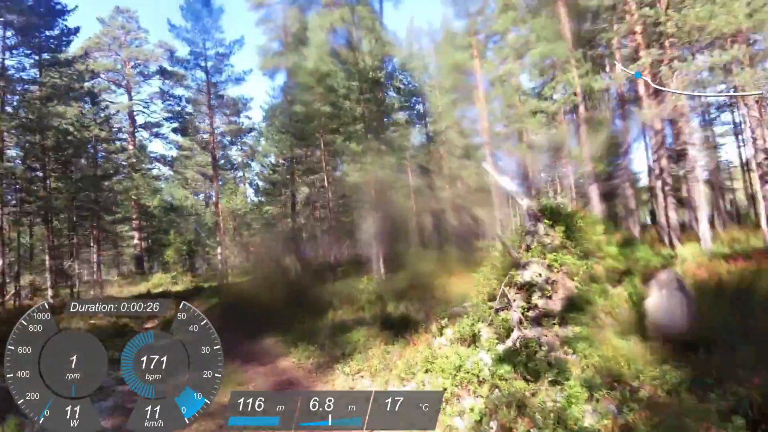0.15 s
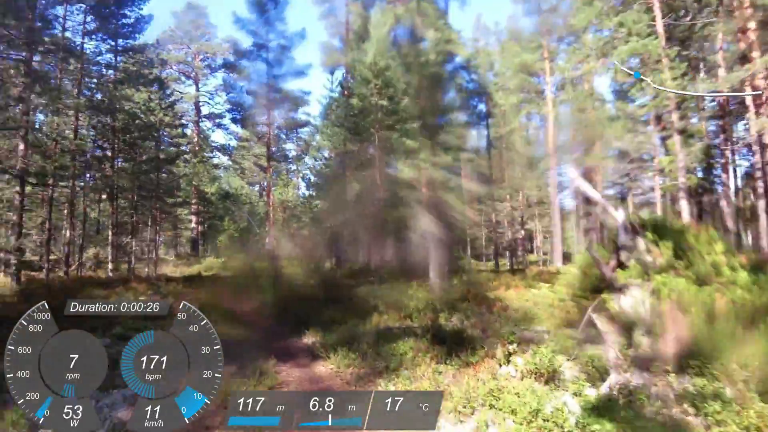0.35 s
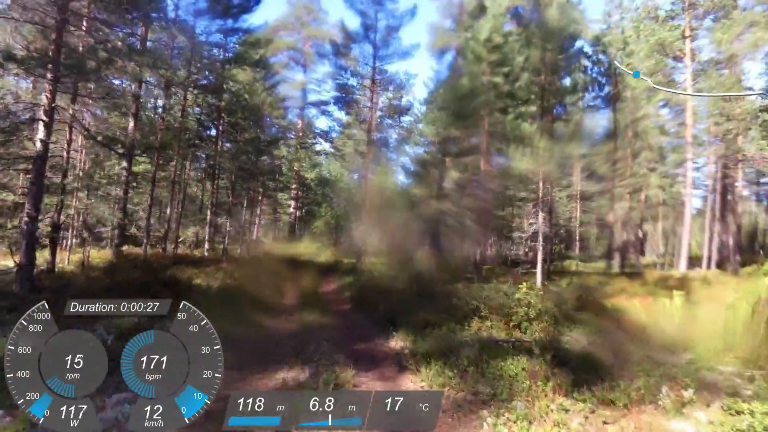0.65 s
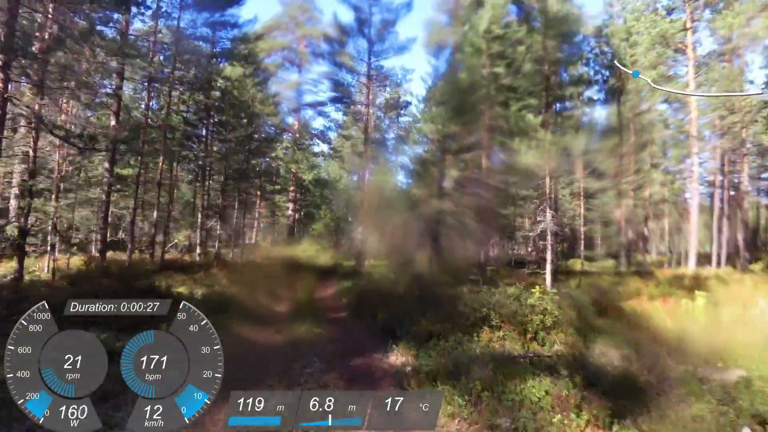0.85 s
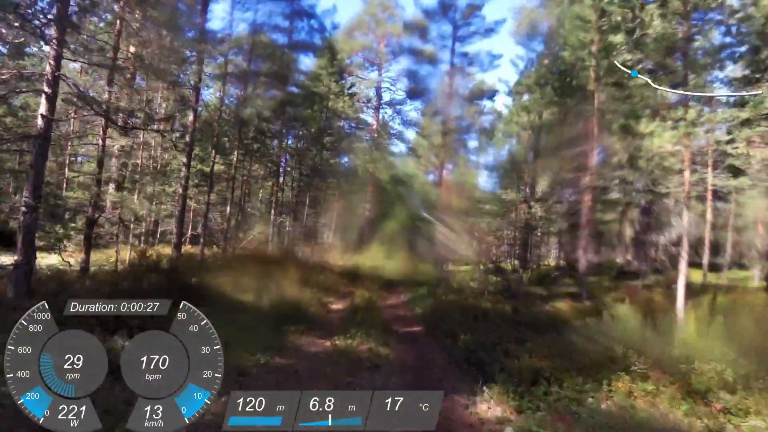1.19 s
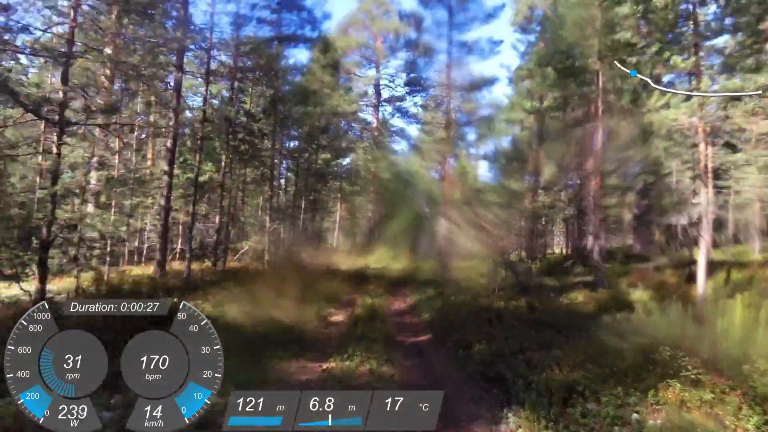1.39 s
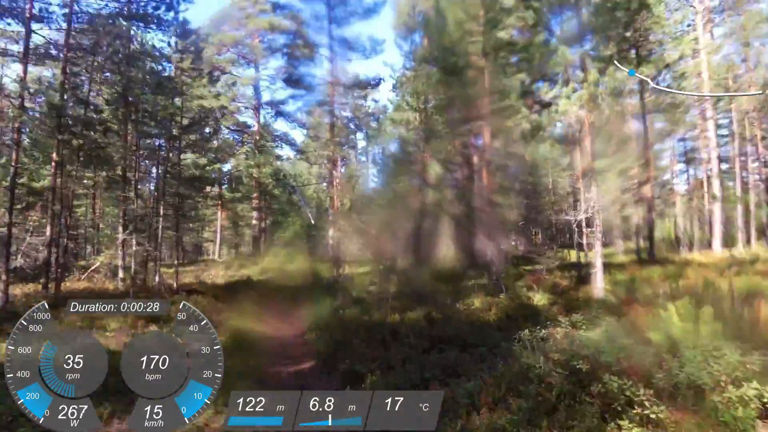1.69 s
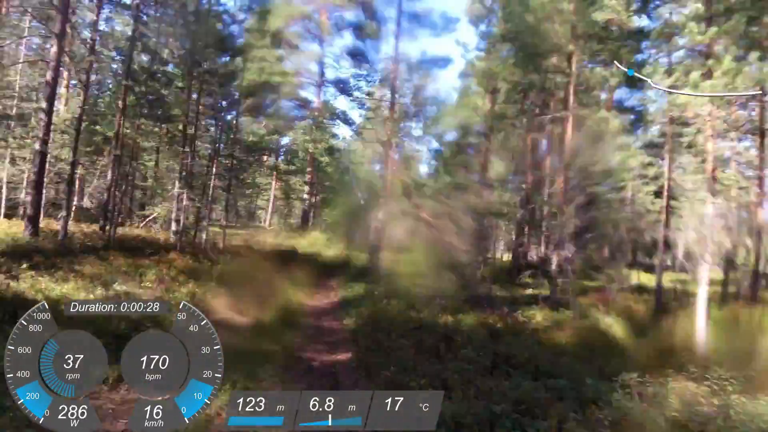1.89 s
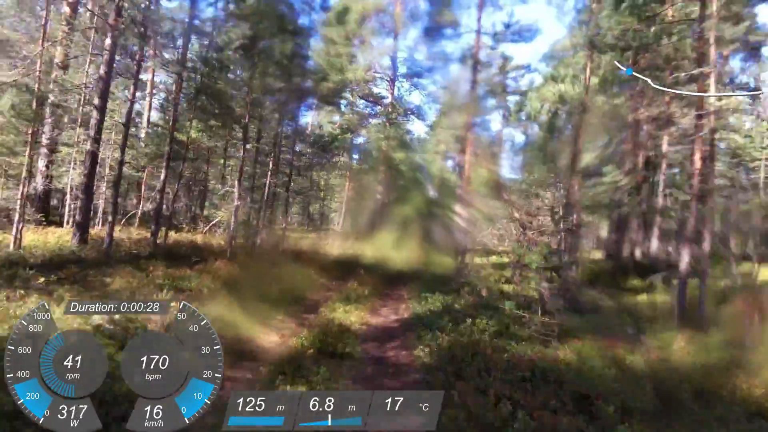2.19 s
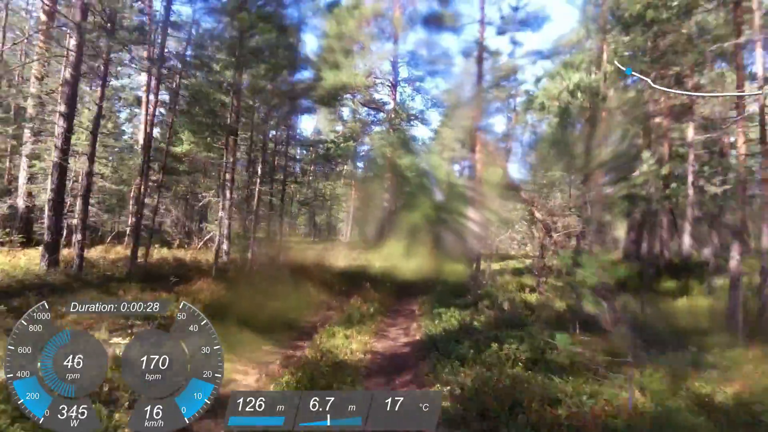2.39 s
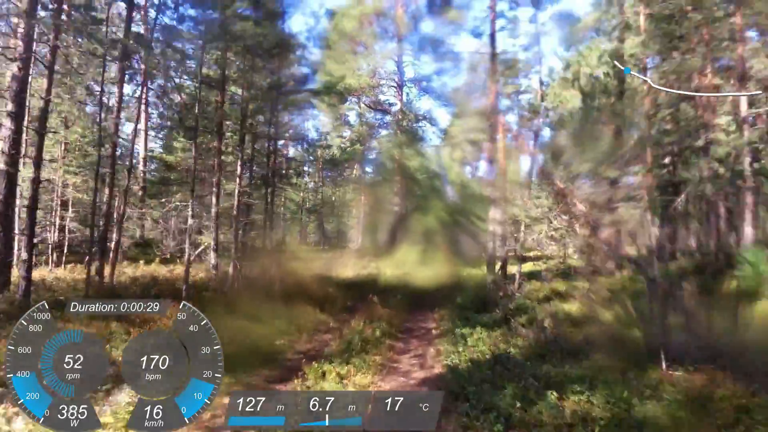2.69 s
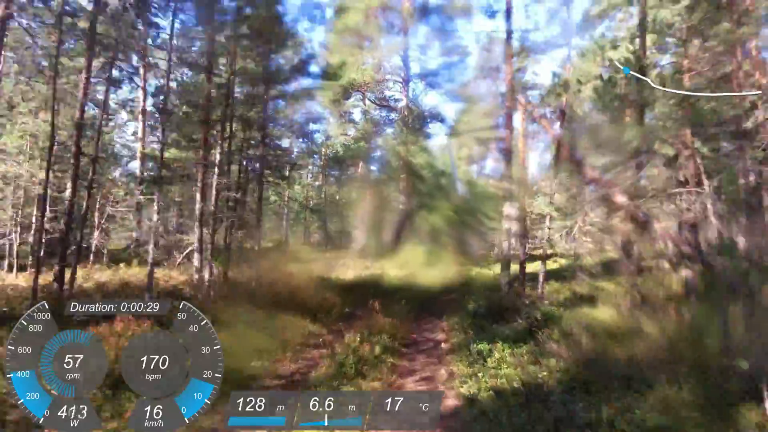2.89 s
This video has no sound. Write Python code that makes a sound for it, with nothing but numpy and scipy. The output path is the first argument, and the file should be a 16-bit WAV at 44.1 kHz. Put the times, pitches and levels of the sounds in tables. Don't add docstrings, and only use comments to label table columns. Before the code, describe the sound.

A mountain bike rattles over roots on a forest trail: an opening burst of hard knocks, scattered clacks and chain ticks, then denser blows, heard close and muffled through a camera clamped to the bike.

```python
import sys
import numpy as np
from scipy import signal
from scipy.io import wavfile
from scipy.ndimage import uniform_filter1d

SR = 44100
rng = np.random.default_rng(int(sys.argv[2]) if len(sys.argv) > 2 else 0)


def master(y):
    cut = np.clip(np.atleast_2d(y).T, -1, 1)
    pcm = np.round(cut * 32767)
    wavfile.write(sys.argv[1], SR, pcm.astype(np.int16))


def magnitude_from_level(level_db):
    exponent = np.asarray(level_db, float) / 20
    return 10 ** exponent


N = 134505

# time_s, tyre_bounce_db, frame_hum_db, chain_load_db
RIDE = [(0, -29, -31, -42.5), (.1, -46, -25, -31), (.24, -49.5, -31, -42), (0.502, -38.5, -28, -44.5),
        (.62, -30.5, -28, -45.5), (1.002, -33, -30.5, -44.5), (1.301, -26.5, -32.5, -38),
        (1.501, -36.5, -23.5, -37), (1.6, -38.5, -31.5, -43.5), (1.9, -33, -29.5, -39.5),
        (2.15, -26, -31, -38), (2.37, -34, -30, -41), (2.601, -30, -32.5, -35.5), (3.05, -34, -23, -37.5)]
# pitch_hz, width_hz, level_db
TYRE_MODES = [(102.5, 19, -5.5), (132, 25, -5.5), (175, 160, -6), (255, 50, -7), (303.5, 89, -10)]
# pitch_hz, width_hz, level_db
FRAME_MODES = [(300, 160, -3.5), (431.5, 90.5, -2.5), (490, 44.6, -6), (576, 172, -2.5), (698, 150, -11),
               (826, 144, -10)]
# pitch_hz, width_hz, level_db
HOUSING_MODES = [(1150, 310, 1.5), (1600, 180, 3), (2105, 320, 4.5), (2485, 180, 4), (3080, 383, 3),
                 (3586, 626, 4), (3769, 624, 3), (4850, 1000, -12)]
# pitch_hz, width_hz, level_db
WHEEL_MODES = [(426.2, 11, -2), (471, 11.2, -2), (572.6, 50, -3), (700, 48, -6), (863, 71, -22.5),
               (1430, 45, -29.5), (1590, 46, -29)]
# start_s, level_db, t60_s, end_s
SINGS = [
    (.2, -22, 5.9, .56),
    (1.267, -19, 0.68, 1.46),
    (2.568, -25.5, 2.1, 3.2),
]
# start_s, level_db, pitch_hz, t60_s
RIM_PARTIALS = [(2.755, -29, 3311, .3), (2.565, -34, 1620, .3), (2.57, -44, 3300, .3),
                (1.303, -30, 1600, .06), (1.339, -32, 1640, .06), (1.697, -25, 2600, .07),
                (.964, -13, 1440, .035), (2.316, -21, 1600, .06), (.582, -9, 900, .045),
                (.2, -39, 1590, .6), (.24, -43, 1430, .4), (1.236, -7, 2250, .05), (.664, -24, 1500, .06),
                (2.58, -27, 700, .5), (2.78, -27, 710, .5), (2.314, -30, 6400, .03),
                (1.551, -10, 3050, .04), (2.482, -13, 2160, .04)]
# start_s, level_db, pitch_hz
THUDS = [(0.095, -6, 175), (0.137, -0.5, 117.8), (0.3, -22, 470), (0.39, -20, 475), (0.426, -23, 444),
         (1.255, -13, 243), (0.511, -23, 470), (1.976, -14.5, 280), (2.234, -13, 424), (2.495, -14, 289),
         (2.769, -1.5, 329), (0.552, -7, 133), (0.74, -12, 126), (0.973, -10, 137), (1.243, 1.5, 255),
         (1.502, -1.5, 125.4), (1.529, -10, 300), (1.7, -12, 269), (1.97, -7.5, 247.6), (2.179, -10.5, 114),
         (2.211, -9, 193.5), (2.272, -5, 198), (2.276, -7, 322), (2.32, -7, 256), (2.489, -15.5, 180),
         (2.556, 1, 256), (2.564, -12, 106.8), (2.659, -6.5, 284), (2.952, -17, 117.4)]
# start_s, level_db, pitch_hz
TICKS = [(0.038, -26, 2220), (0.083, -30, 2650), (0.088, -21, 2980), (0.2197, -33, 3690), (0.27, -38, 3000),
         (0.393, -33, 3080), (0.722, -35, 2600), (0.809, -49, 2100), (1.176, -35, 2530), (1.228, -27, 2190),
         (1.376, -33.5, 2360), (1.566, -31, 3000), (0.924, -31, 3100), (1.458, -14, 2150),
         (1.529, -21, 3070), (1.54, -16, 3060), (1.676, -18, 3600), (1.682, -11.5, 2360),
         (1.769, -24.5, 2580), (1.81, -23.5, 1990), (1.841, -43.5, 3270), (1.912, -22, 3080),
         (2.036, -36, 1600), (2.333, -20, 3380), (2.408, -14.5, 3590), (2.425, -11, 3080),
         (2.999, -25.5, 2070), (1.62, -40.5, 2500), (1.861, -38, 3060), (1.892, -42, 3380),
         (2.097, -42, 3270), (2.178, -32, 2500), (2.694, -33, 3420), (2.897, -40, 3150), (3.035, -31, 3300)]
# start_s, clack_db, frame_db, frame_pitch_hz, frame_t60_s
KNOCKS = [(0.104, -1.5, 4.5, 378.6, 0.12), (.116, 4.5, 4, 427.7, 0.045), (.127, -3, -8.5, 340, 0.062),
          (0.155, 0.5, 6, 371.5, 0.085), (.169, -2, -1, 413, 0.058), (.581, -5.5, -6, 437, 0.021),
          (.737, -21.5, -7.5, 426, 0.061), (.748, -19.5, -24.5, 434, 0.031),
          (0.961, -13.5, 1.5, 490, 0.023), (1.235, 2, -1, 454.3, 0.064), (1.473, -1.5, -1, 489.3, 0.12),
          (1.487, -1, -4.5, 450, 0.086), (1.549, -2, -12.5, 443, 0.04), (1.691, -6, -9, 508, 0.047),
          (1.721, -16.5, -8, 530, 0.02), (1.964, -12.5, -5, 516, 0.015), (2.016, -4, -5, 490, 0.021),
          (2.204, -1, -5, 330.5, 0.027), (2.221, -2.5, -9, 440, 0.019), (2.266, -13, -8.5, 420.5, 0.049),
          (2.313, -5.5, -10, 264, 0.093)]
# start_s, clack_db, frame_db, frame_pitch_hz, frame_t60_s
LATE_KNOCKS = [(0.654, -28, -12.5, 300, 0.03), (.664, -27, -16.5, 355, 0.015),
               (0.937, -22, -18.5, 528, 0.071), (2.131, -18, -12.5, 400, 0.013),
               (2.450, -6.5, -5, 564, 0.014), (2.481, -5.5, -8.5, 325.6, 0.07),
               (2.549, 4, -2.5, 423.2, 0.066), (2.646, 2, -3, 511, 0.056), (2.722, -16, -12.5, 324.4, 0.12),
               (2.752, 0.5, -4.5, 419, 0.064), (2.854, -15.5, -1.5, 275, 0.054),
               (2.945, -5.5, -4, 546, 0.018), (2.956, -3.5, -8.5, 400.6, 0.039),
               (.142, -14.5, -12.5, 300, 0.058), (0.187, -17, -9, 481, 0.062),
               (.207, -23.5, -12, 464, 0.054)]
CLACK_HZ = [1663, 1374, 1430, 2110, 1600, 3100, 3300, 1460, 1456, 3705, 3010, 1600, 3015, 2360, 2380, 2414,
            3090, 1590, 3030, 2365, 3100, 1600, 1590, 2530, 3430, 3245, 2184, 2506, 2196, 1670, 3296, 1090,
            2495, 1630, 3040, 2140, 1486]


def peaked(x):
    return x / (abs(x).max() + 1e-12)


def evened(x):
    return x / np.sqrt(np.mean(x ** 2) + 1e-20)


def add(mix, start_s, sound):
    part = mix[max(round(start_s * SR), 0):][:len(sound)]
    part += sound[:len(part)]


def lumps(per_s):
    grid_hz = 400
    count = int(N / SR * grid_hz) + 2
    steps = uniform_filter1d(rng.standard_normal(count), size=max(int(grid_hz / per_s), 1))
    return np.interp(np.arange(N) / SR * grid_hz, np.arange(count), evened(steps))


def ring(x, modes, spread_db=0., steep=True, wander_db=0.):
    out = np.zeros(len(x))
    chance = rng.standard_normal(len(modes))
    for k, (hz, width, db) in enumerate(modes):
        radius = np.exp(-np.pi * width / SR)
        pole = [1, -radius * np.exp(2j * np.pi * hz / SR)]
        y = signal.lfilter([1 - radius], pole, x)
        if steep:
            y = signal.lfilter([1 - radius], pole, y)
        drift = magnitude_from_level(wander_db * lumps(11)) if wander_db else 1
        sign = (-1) ** k
        out += sign * magnitude_from_level(db + spread_db * chance[k]) * drift * y.real / np.sqrt(width)
    return out


def wind():
    gusts = rng.standard_normal(N) * magnitude_from_level(8.9 * lumps(3.5))
    return magnitude_from_level(-74) * evened(ring(gusts, [(50.3, 45, 0)]))


def trail_hiss(load_db):
    band = evened(ring(rng.standard_normal(N), [(4800, 5700, 0)]))
    return magnitude_from_level(-54 + 0.5 * load_db + 2.8 * lumps(8)) * band


def tyre_bounce(bounce_db):
    shaking = rng.standard_normal(N) * magnitude_from_level(3.5 * lumps(20))
    return evened(ring(shaking, TYRE_MODES)) * magnitude_from_level(bounce_db + 6.0)


def frame_hum(hum_db):
    shaking = rng.standard_normal(N) * magnitude_from_level(0.56 * lumps(50))
    return evened(ring(shaking, FRAME_MODES[1:], spread_db=3)) * 0 + hum_level(shaking, hum_db)


def hum_level(shaking, hum_db):
    return evened(ring(shaking, FRAME_MODES[1:], wander_db=3)) * magnitude_from_level(hum_db - 1.5)


def housing_chatter(load_db):
    impacts_per_s, grit_t60 = 240, 0.0064
    hits = rng.random(N) < impacts_per_s / SR
    impacts = hits * magnitude_from_level(2 * np.minimum(rng.exponential(1, N), 4))
    decay = magnitude_from_level(-60 * np.arange(800) / SR / grit_t60)
    grit = evened(signal.oaconvolve(impacts, decay)[:N] * rng.standard_normal(N))
    shaking = rng.standard_normal(N) * magnitude_from_level(2.5 * lumps(30)) + magnitude_from_level(-9.5) * grit
    return evened(ring(shaking, HOUSING_MODES, wander_db=0.5)) * magnitude_from_level(load_db - 8.0)


def rolling():
    time_s, *levels = np.transpose(RIDE)
    bounce_db, hum_db, load_db = [np.interp(np.arange(N) / SR, time_s, db) for db in levels]
    ground = tyre_bounce(bounce_db) + frame_hum(hum_db)
    return ground + wind() + trail_hiss(load_db) + housing_chatter(load_db)


def wheel_singing():
    t = np.arange(N) / SR
    level = np.zeros(N)
    for start, db, t60, end in SINGS:
        gate = np.clip(np.minimum(t - start, end - t) / 0.0062, 0, 1)
        level += magnitude_from_level(db - 60 * np.maximum(t - start, 0) / t60) * gate
    shaking = rng.standard_normal(N) * magnitude_from_level(0.73 * lumps(45))
    return level * evened(ring(shaking, WHEEL_MODES, spread_db=4.2))


def damped_partial(db, hz, t60, rise_s):
    t = np.arange(12000) / SR
    return magnitude_from_level(db - 60 * t / t60) * np.minimum(t / rise_s, 1) * np.sin(2 * np.pi * hz * t)


def rim_partial(db, hz, t60):
    return damped_partial(db, hz, t60, rise_s=0.0066)


def thud(db, hz):
    return damped_partial(db, hz, 17.3 / hz, rise_s=0.0024)


def tick(db, hz):
    t = np.arange(2500) / SR
    burst = rng.standard_normal(len(t)) * magnitude_from_level(-60 * t / 0.022) * np.minimum(t / 0.0013, 1)
    snap = magnitude_from_level(-20.5) * peaked(ring(burst, [(3100, 2100, 0)]))
    body = 1.1 * peaked(ring(burst, HOUSING_MODES[1:], spread_db=3))
    favoured = peaked(ring(burst, [(hz, 500, 0)]))
    return magnitude_from_level(db) * peaked(body + favoured + snap)


def housing_clack(noise, t, favoured_hz):
    tail = magnitude_from_level(-28.5 - 60 * t / 0.11)
    burst = noise * (magnitude_from_level(-60 * t / 0.024) + tail) * np.minimum(t / 0.0009, 1)
    body = peaked(ring(burst, HOUSING_MODES, spread_db=3.6))
    favoured = magnitude_from_level(-2.5) * peaked(ring(burst, [(favoured_hz, 403, 0)]))
    snap = magnitude_from_level(-14) * peaked(ring(burst, HOUSING_MODES, spread_db=3, steep=False))
    return peaked(body + favoured + snap)


def frame_swing(noise, t, hz, t60):
    u = np.maximum(t - 0.0021, 0)
    decay = magnitude_from_level(-60 * (1.64 * u / t60) ** 2) + magnitude_from_level(-22 - 30 * u / t60)
    shape = np.minimum(u / 0.0021, 1) * decay
    glide = 0.2933 * np.exp(-u / 0.00609)
    sag = np.minimum(5 * u, .4)
    smooth = uniform_filter1d(uniform_filter1d(noise, size=150), size=150)
    pitch_hz = hz * (1 + glide - sag + .055 * evened(smooth))
    tone = np.sin(2 * np.pi * np.cumsum(pitch_hz) / SR) * shape
    rough = rng.standard_normal(len(t)) * shape
    return tone + peaked(ring(rough, FRAME_MODES, spread_db=5.4))


def knock(clack_db, frame_db, hz, t60, favoured_hz):
    t = np.arange(6000) / SR
    noise = rng.standard_normal(len(t))
    clack = magnitude_from_level(clack_db) * housing_clack(noise, t, favoured_hz)
    return clack + magnitude_from_level(frame_db) * frame_swing(noise, t, hz, t60)


def scene():
    mix = rolling() + wheel_singing()
    for start, *partial in RIM_PARTIALS:
        add(mix, start, rim_partial(*partial))
    for start, *blow in THUDS:
        add(mix, start, thud(*blow))
    for start, *tap in TICKS:
        add(mix, start, tick(*tap))
    for (start, *blow), favoured_hz in zip(list(KNOCKS) + list(LATE_KNOCKS), CLACK_HZ):
        add(mix, start, knock(*blow, favoured_hz))
    mount = signal.butter(2, 45.4, "high", fs=SR, output="sos")
    return signal.sosfilt(mount, mix)[None]


def band_limit(x):
    return signal.sosfilt(signal.butter(12, 16340, fs=SR, output="sos"), x)


def record(dry):
    ceiling, knee = .57, 20
    flat = dry / (1 + abs(dry / ceiling) ** knee) ** (1 / knee)
    flat = signal.lfilter(*signal.butter(1, 3600, fs=SR), flat)
    flat = signal.lfilter(*signal.butter(1, 25, "high", fs=SR), flat)
    return band_limit(flat)


dry = scene()
out = record(dry)
master(out)
```